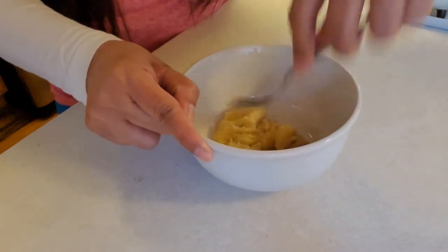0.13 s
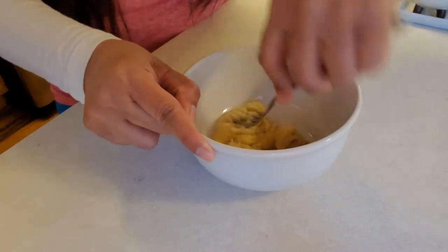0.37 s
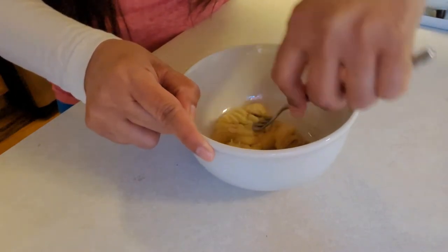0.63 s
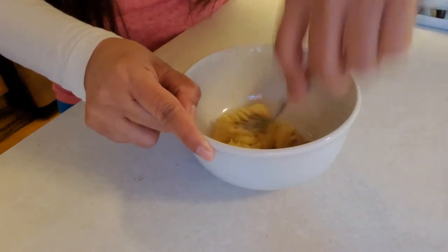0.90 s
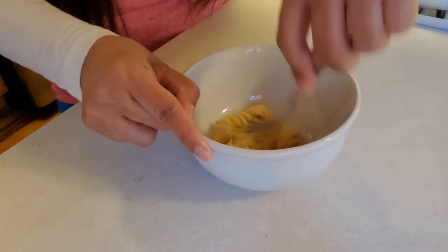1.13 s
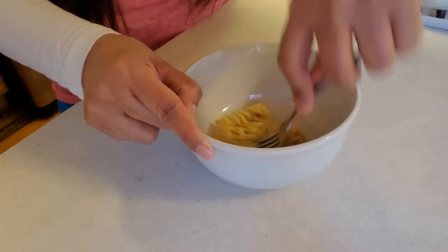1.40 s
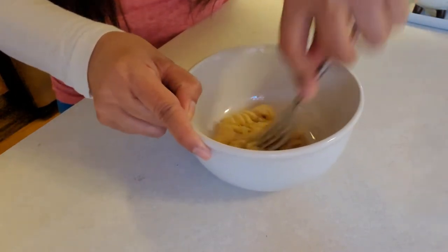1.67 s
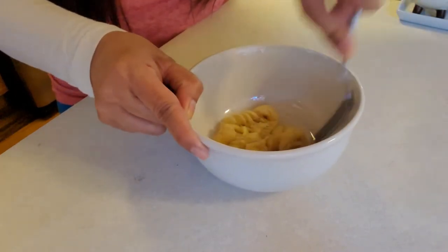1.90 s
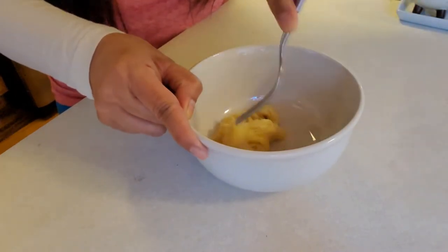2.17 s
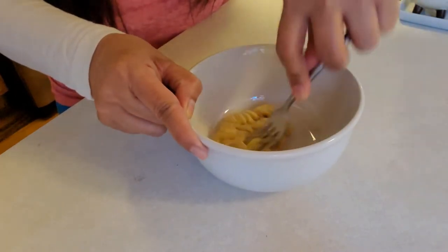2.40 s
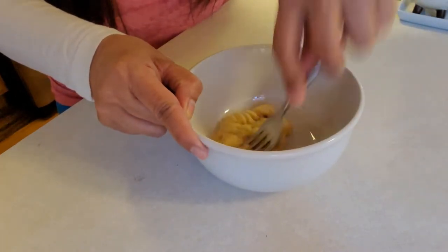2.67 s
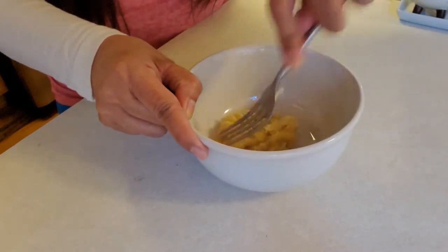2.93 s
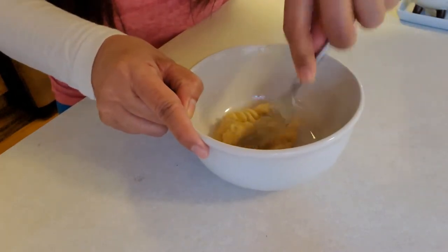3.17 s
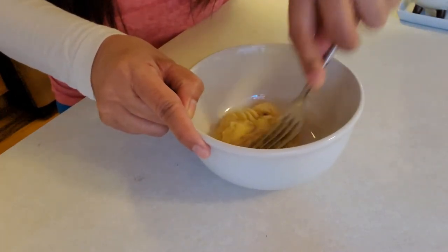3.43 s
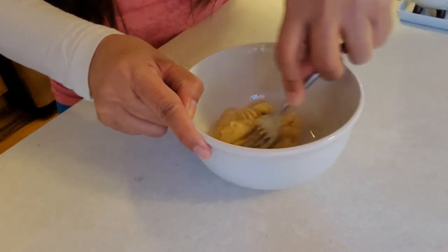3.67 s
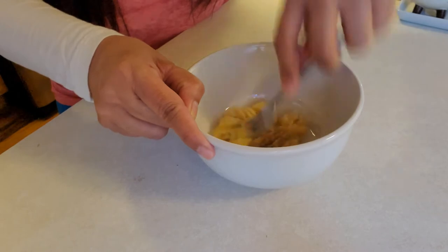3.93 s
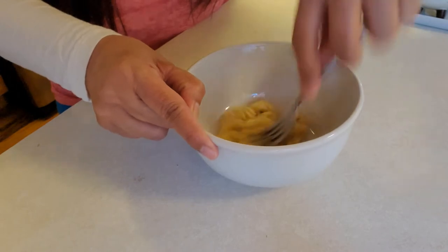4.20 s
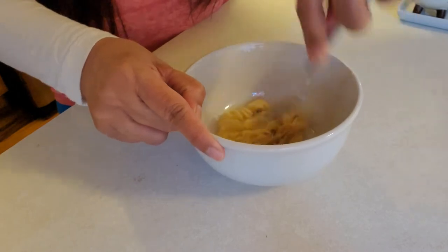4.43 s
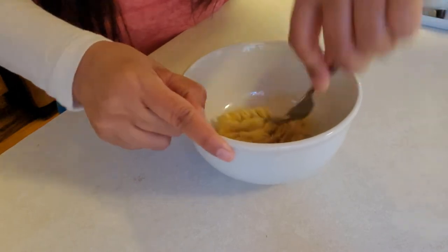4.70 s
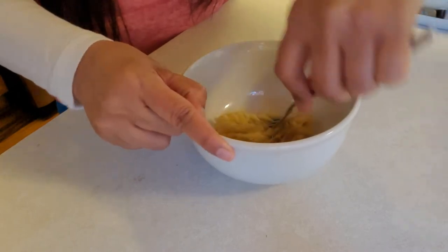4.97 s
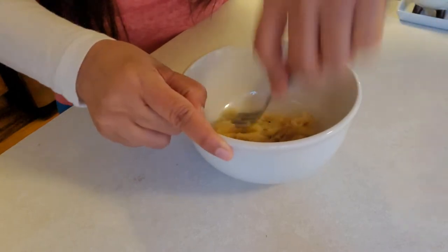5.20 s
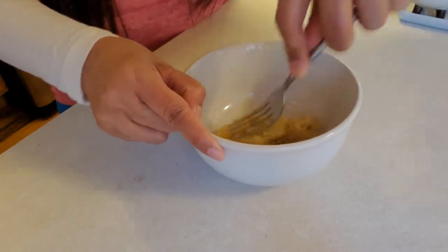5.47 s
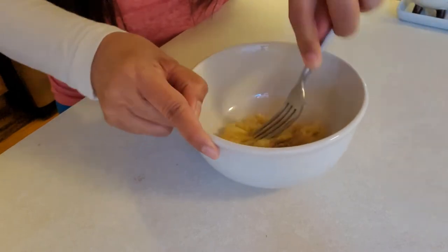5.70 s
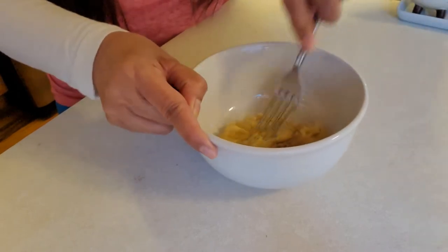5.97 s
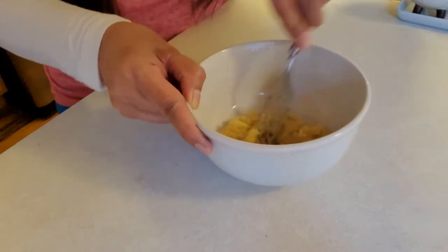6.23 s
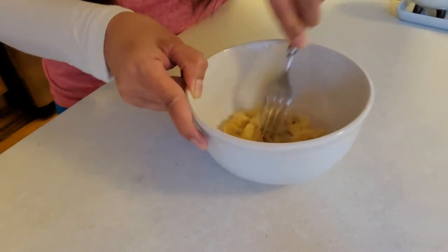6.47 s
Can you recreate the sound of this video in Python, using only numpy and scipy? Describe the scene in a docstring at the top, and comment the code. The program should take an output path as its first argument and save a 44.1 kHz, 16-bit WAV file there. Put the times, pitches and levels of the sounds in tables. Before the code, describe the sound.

Close stereo pickup in a small kitchen, with a faint, steady low rumble throughout. For the first 1.2 s a fork presses soft fruit very quietly: muffled low bumps, tiny wet ticks, faint crackle. Damped fork strikes on the ceramic bowl floor follow at 1.3 and 1.6 s, then a loud bare-wall clink at 1.87 s with an instant bounce and a short bright ring, and a firm knock with a deep counter thud at 1.95 s. Sticky clicks and crackles fill 2.0-2.6 s. Duller taps come at 2.7, 3.05, 3.3 and 3.65 s, with pulp snaps between. Squishing leads to a crisper tap at 4.5 s, another at 4.9 s, and a strong thudding hit at 5.2 s with a faint metallic fork ring. A soft tap at 5.5 s gives way to wet smears and smacks from 6.0 s, most squelchy around 6.4 s.

```python
"""Kitchen counter: a steel fork mashes soft fruit in a ceramic bowl, close to a pair of microphones.
Strikes through the pulp and clinks on the bare wall: noisy tick, decaying bowl and tine modes, chatter.
Each contact also drives the counter's low modes as a thud; once the fork's neck rings.
Pulp smacks (short clicks), crackles and squishes (shaped random snaps); room tails and a steady noise rumble."""
import sys
import numpy as np
from scipy import signal
from scipy.fft import rfft, irfft, next_fast_len
from scipy.io import wavfile
from scipy.ndimage import map_coordinates

SR = 44100
rng = np.random.default_rng(int(sys.argv[2]) if len(sys.argv) > 2 else 0)


def to_wav(sig):
    """Store sig (one row per channel, or 1-D mono) as 16-bit WAV at the path in sys.argv[1].

    Samples outside -1..1 are clipped; the rate is SR.
    """
    pcm = np.clip(np.atleast_2d(sig), -1, 1) * 32767
    pcm = np.round(pcm).astype(np.int16)
    wavfile.write(sys.argv[1], SR, pcm.T)  # frames by channels


def to_linear_factor(level_db):
    """Convert decibel levels (scalar or array-like) to linear amplitude factors."""
    exponent = np.asarray(level_db, float) / 20
    return 10 ** exponent


N = 291060

# tines strike the bowl floor through pulp:
# (time [s], strike level [dB], tine ring level [dB], thud level [dB], contact time [ms])
FLOOR_BLOWS = [(1.288, -26.5, -49, -34, 3.5), (1.592, -23, -51, -28.5, 3.04), (1.9554, -14, -31, -15.5, 2),
               (2.703, -25.5, -62, -32.5, 4.4), (3.046, -30, -72, -34.5, 3.6), (3.3294, -28, -82, -36, 3.6),
               (3.639, -27.5, -62, -39.5, 4.2), (4.5325, -23.5, -31, -23, 1.26),
               (4.8703, -27, -56, -32.5, 4.4), (5.2127, -19, -71, -22, 2.15),
               (5.524, -29.5, -72, -40.5, 2.7), (6.365, -35, -69, -42, 2.37)]
# fork presses the pulp and softly loads the counter:
# (time [s], thud level [dB], contact time [ms], squelch level [dB])
PULP_PRESSES = [(0.132, -46, 13.5, -79), (0.524, -48.5, 12, -106), (0.918, -42, 13.7, -94),
                (3.011, -49, 10.4, -83), (3.078, -41.5, 3.4, -60.5), (3.108, -48, 3.2, -77),
                (4.216, -44.5, 9.2, -95), (4.278, -50.5, 3.8, -67), (5.3, -51, 3.9, -64),
                (5.803, -49, 17.2, -91), (6.352, -43.5, 5, -94)]
# fork clinks on the bare wall and bounces: (time [s], strike level [dB], bowl ring level [dB])
WALL_CLINKS = [(1.868, -8, -25.5), (1.8806, -18, -38)]
# left-right likeness: (frequency [Hz], correlation [0-1])
LIKENESS = [(60, 0.91), (300, 0.77), (640, 0.65), (1400, 0.031)]


def unit(x):
    """Scales to rms 1."""
    return x / np.sqrt(np.mean(x ** 2) + 1e-20)


def along(points, hz):
    """Interpolates (Hz, value) points on a log frequency axis."""
    point_hz, value = np.transpose(points)
    return np.interp(np.log(hz + 1), np.log(point_hz + 1), value)


def filtered(x, response):
    """Multiplies the spectrum of x by a response of frequency."""
    m = next_fast_len(N + SR // 2)
    return irfft(rfft(x, m) * response(np.fft.rfftfreq(m, 1 / SR)), m)[..., :N]


def add(track, start_s, sound):
    """Mixes a sound in from start_s, cut at the end of the track."""
    part = track[..., round(start_s * SR):][..., :sound.shape[-1]]
    part += sound[..., :part.shape[-1]]


def stereo_angle(hz):
    """Half the angle whose cosine is the left-right likeness."""
    return np.arccos(np.clip(along(LIKENESS, hz), -1, 1)) / 2


def kitchen(x, wet_db, lag_s, echo_db):
    """Direct sound, late at the left by lag_s; bowl-wall echoes unlike per side; room tail alike in the bass."""
    # room decay: (frequency [Hz], t60 [s])
    room_t60 = [(100, 0.33), (420, 0.54), (1100, 0.49), (3000, 0.33), (8000, 0.32), (15000, 0.23)]
    inside_s = 0.0012  # bowl echoes arrive within this time
    hz, t, z = signal.stft(rng.standard_normal((2, SR // 2)), SR, nperseg=256)
    angle = stereo_angle(hz)[:, None]
    z = np.cos(angle) * z[0] + np.sin(angle) * z[1] * [[[1]], [[-1]]]
    decay = to_linear_factor(-60 * t / along(room_t60, hz)[:, None])
    tail = signal.istft(z * decay, SR, nperseg=256)[1]
    path = to_linear_factor(wet_db) * np.pad(tail / np.linalg.norm(tail[0]), ((0, 0), (150, 0)))
    path[[0, 1], [round(lag_s * SR), 0]] = 1  # direct sound
    echoes = rng.integers(2, round(inside_s * SR), size=(2, 4))
    path[[[0], [1]], echoes] += to_linear_factor(echo_db) * rng.choice([-1, 1], size=(2, 4))
    return signal.fftconvolve(x[None], path, axes=1)


def ring(modes, scatter_db, blur_hz, seconds):
    """Damped sine modes, strengths redrawn per call; random phase drift slightly blurs each mode's pitch."""
    t = np.arange(round(seconds * SR)) / SR
    hz, db, t60 = np.transpose(modes)[:, :, None]
    db = db + scatter_db * rng.standard_normal(hz.shape)
    # random-walk phase, one step per 64 samples
    steps = rng.standard_normal((len(hz), len(t) // 64 + 1))
    walk = np.sqrt(2 * np.pi * blur_hz / SR) * np.sqrt(64) * np.cumsum(steps, axis=1)
    drift = np.array([np.interp(t, np.arange(len(d)) * 64 / SR, d - d[0]) for d in walk])
    onset = 1 - np.exp(-t / 0.00059)
    return (to_linear_factor(db - 60 * t / t60) * np.sin(2 * np.pi * hz * t + drift)).sum(0) * onset


def tick(hz, cycles, crack, t60):
    """Contact click of peak 1: a damped tone of its own colour plus a crack of band noise."""
    t = np.arange(SR // 50) / SR
    tone = np.exp(-t * hz / cycles) * np.sin(2 * np.pi * hz * t)
    band = signal.butter(2, [0.55 * hz, min(5 * hz, 15500)], "band", fs=SR)
    noise = signal.lfilter(*band, rng.standard_normal(len(t)))
    click = tone + crack * to_linear_factor(-60 * t / t60) * noise
    click = signal.lfilter(*signal.butter(2, 0.55 * hz, "high", fs=SR), click)
    return click / np.abs(click).max()


def rumble():
    """Steady shaped noise, left and right alike in the bass only."""
    # rumble spectrum: (frequency [Hz], relative density [dB])
    rumble_spectrum = [(25, -11), (70, 0.5), (130, -6.5), (240, 0), (400, -3), (540, -10.5), (800, -18.5),
                       (1250, -29.5), (2500, -35), (4200, -39), (5100, -35.5), (6000, -40), (14800, -47.5),
                       (16500, -60.5)]

    def mid_side(hz):
        angle = stereo_angle(hz)
        return to_linear_factor(along(rumble_spectrum, hz)) * [np.cos(angle), np.sin(angle)]

    mid, side = filtered(rng.standard_normal((2, N)), mid_side)
    return to_linear_factor(-58.5) * unit(np.array([mid + side, mid - side]))


def grains(spectrum, rate, spread_db, hiss):
    """Scattered snaps of unequal size over a little hiss, coloured, rms 1."""
    when, size = rng.standard_normal((2, N))
    chosen = np.abs(when) < 1.25 * rate / SR  # about rate snaps a second
    snaps = to_linear_factor(spread_db * size) * np.sign(when) * chosen
    mixed = unit(snaps) + hiss * rng.standard_normal(N)
    return unit(filtered(mixed, lambda hz: to_linear_factor(along(spectrum, hz))))


def stroke(length_s):
    """Smooth envelope of one short stretch of pulp sound."""
    return signal.windows.tukey(max(round(length_s * SR), 3), 0.4)


def mash():
    """Pulp crackles finely where tines pull free, squishes lower where pressed or smeared."""
    # tines pull free of sticky pulp: (time [s], length [s], crackle level [dB])
    pulls = [(0.141, 0.21, -79), (0.364, 0.091, -78.5), (0.498, 0.32, -81), (0.893, 0.18, -79.5),
             (1.106, 0.069, -78), (2.299, 0.082, -67), (2.43, 0.025, -72), (2.497, 0.029, -65.5),
             (2.748, 0.054, -64), (3.083, 0.066, -74), (3.407, 0.093, -73.5), (3.676, 0.083, -62),
             (3.898, 0.13, -74), (4.046, 0.055, -72.5), (4.189, 0.048, -74), (4.32, 0.052, -73),
             (4.64, 0.074, -71), (5.032, 0.08, -76), (5.248, 0.084, -65), (5.656, 0.015, -80),
             (5.897, 0.026, -77), (6.121, 0.13, -72), (6.38, 0.11, -68)]
    # fork smears pulp along the wall, one list a sweep: (time [s], squish level [dB])
    smears = [
        [(0.98, -109), (1.048, -77), (1.14, -92), (1.192, -70), (1.256, -97), (1.27, -78)],
        [(4.1, -75), (4.186, -70), (4.256, -85), (4.284, -69), (4.372, -81.5), (4.52, -66.5)],
        [(5.36, -97), (5.44, -82), (5.52, -64), (5.752, -85), (5.776, -81), (5.85, -89)],
        [(6.04, -79.5), (6.074, -71), (6.206, -64), (6.232, -65.5), (6.43, -58.5), (6.59, -82.5)],
    ]
    # grain spectra: (frequency [Hz], relative density [dB])
    crackle_spectrum = [(1800, -17), (3300, 9.5), (6000, 8.5), (9000, 8.5), (12500, 3.5), (16000, -5)]
    squish_spectrum = [(300, -5.5), (700, -4), (1200, -3.5), (2000, -9.5), (3200, -16.5), (5000, -19),
                       (8000, -29)]
    lead_s, lead_length_s, lead_db = 0.014, 0.011, -73.5  # a faint short crackle just before each blow
    squelch_s, squelch_lead_s = 0.062, 0.019
    lumps_per_s, lump_db = 30, 2  # lumps give way unevenly
    fine, low = np.zeros((2, N))
    for s, length_s, db in pulls:
        add(fine, s, to_linear_factor(db) * stroke(length_s))
        add(low, s, to_linear_factor(db - 5.5) * stroke(length_s))
    for s, *_ in FLOOR_BLOWS:
        add(fine, s - lead_s, to_linear_factor(lead_db) * stroke(lead_length_s))
    for s, *_, db in PULP_PRESSES:
        add(low, s - squelch_lead_s, to_linear_factor(db) * stroke(squelch_s))
    for sweep in smears:
        s, db = np.transpose(sweep)
        t = np.arange(s[0], s[-1], 1 / SR)
        add(low, s[0], to_linear_factor(np.interp(t, s, db)) * signal.windows.tukey(len(t), 0.15))
    crackle = fine * grains(crackle_spectrum, rate=220, spread_db=5, hiss=0.8)
    lump_points = rng.standard_normal(round(N * lumps_per_s / SR) + 4)
    lumps = map_coordinates(lump_points, [np.arange(N) * lumps_per_s / SR])
    squish = low * to_linear_factor(lump_db * lumps) * grains(squish_spectrum, rate=400, spread_db=5, hiss=0.65)
    return kitchen(crackle + squish, wet_db=-2.5, lag_s=0, echo_db=-12.5)[:, :N]


def smacks():
    """Air pockets and sticky threads snap open as clicks; neighbours get different echoes and tails."""
    # wet smacks of the pulp: (time [s], peak level [dB], colour [Hz])
    wet_smacks = [(0.2482, -46, 3330), (0.5726, -49, 2460), (0.918, -58, 8000), (0.943, -52.5, 7100),
                  (0.975, -61, 7950), (1.1414, -52.5, 10000), (1.245, -53, 6450), (1.4653, -46, 8600),
                  (2.0624, -38.5, 5040), (2.0814, -48, 7730), (2.3263, -45, 11900), (2.363, -48, 8400),
                  (2.4543, -45, 9640), (2.5071, -46, 5900), (2.806, -37, 8800), (3.014, -54.5, 3920),
                  (3.078, -42.5, 1160), (3.1114, -45.5, 3540), (3.4321, -54, 6070), (3.4797, -45, 4880),
                  (3.692, -42, 3370), (3.7284, -50, 5270), (3.7628, -37, 13500), (3.935, -49.5, 9050),
                  (3.9566, -47, 10200), (3.9714, -46, 6900), (4.047, -49, 9600), (4.0693, -40.5, 9600),
                  (4.2197, -48.5, 3500), (4.28, -50, 1010), (4.3614, -52, 3330), (4.6708, -38.5, 8050),
                  (4.7242, -42.5, 7350), (4.9, -49, 5070), (5.0699, -50, 9550), (5.204, -58, 2660),
                  (5.3224, -51, 3560), (5.679, -45, 9340), (6.138, -37, 5160), (6.1694, -39, 6000),
                  (6.4048, -45.5, 2500), (6.421, -44, 7900), (6.452, -51, 4000), (6.466, -42, 8200)]
    groups = np.zeros((5, N))
    for k, (s, db, hz) in enumerate(wet_smacks):
        add(groups[k % len(groups)], s, to_linear_factor(db) * tick(hz, cycles=1.3, crack=0.33, t60=0.0093))
    return sum(kitchen(group, wet_db=-4, lag_s=0, echo_db=-3.5)[:, :N] for group in groups)


def thud(db, contact_ms):
    """Counter modes under a push and its release: a longer contact leaves only the lowest."""
    # counter modes: (frequency [Hz], relative level [dB], t60 [s])
    counter_modes = [(70.06, -4.5, 0.45), (82.3, -2.5, 0.33), (107, 0, 0.14), (147.8, 1.5, 0.17),
                     (200, -4.5, 0.06), (226, -10, 0.25), (239, 3.5, 0.035), (300.4, -5, 0.18),
                     (335, -7.5, .07), (394, -16.5, .14), (452.6, -15, 0.18), (531, -17, 0.16),
                     (612.5, -16, 0.066), (702, -9, 0.06), (1100, -14, 0.051)]
    push_share = 0.33  # pulp cushions the start of the push: its share of the release
    tilt_db_per_octave, firm_ms = 3, 2.8  # contacts shorter than firm_ms favour higher modes
    push = np.diff(np.hanning(max(round(contact_ms * SR / 1000), 3)))
    push = push * np.linspace(push_share, 1, len(push))
    modes = np.array(counter_modes)
    hardness = np.clip(np.log2(firm_ms / contact_ms), -1, 1)
    octaves = np.log2(np.minimum(modes[:, 0], 250) / 150)
    modes[:, 1] += tilt_db_per_octave * hardness * octaves
    response = ring(modes, scatter_db=1.0, blur_hz=4.9, seconds=0.41)
    return -to_linear_factor(db) * signal.fftconvolve(response, push / np.abs(push).sum())


def counter_thuds():
    """The force of presses, blows and clinks goes on through the foot of the bowl into the counter."""
    loads = [(s, db, ms) for s, db, ms, _ in PULP_PRESSES]
    loads += [(s, db, ms) for s, _, _, db, ms in FLOOR_BLOWS]
    loads += [(s, bowl_db - 22.5, 6.3) for s, _, bowl_db in WALL_CLINKS]
    counter = np.zeros((2, N))
    for s, db, contact_ms in loads:
        add(counter, s, kitchen(thud(db, contact_ms), wet_db=-10.5, lag_s=0, echo_db=-18.5))
    return counter


def neck_rings():
    """The grip loosens and the modes of the fork's neck ring out."""
    # neck rings: (time [s], level [dB])
    neck_events = [(5.2125, -43)]
    # neck modes: (frequency [Hz], relative level [dB], t60 [s])
    neck_modes = [(3440, -5, .3), (3505, -5, .32), (3560, 4, .06), (2150, 2, .035), (4780, -4, .035)]
    air = np.zeros((2, N))
    for s, db in neck_events:
        neck = ring(neck_modes, scatter_db=1.5, blur_hz=34, seconds=0.4)
        add(air, s, kitchen(to_linear_factor(db) * neck, wet_db=-9, lag_s=0, echo_db=-18))
    return air


def rattle(db, t60, rough_db):
    """Tines chatter unevenly just after contact: decaying band noise, unlike at each side."""
    t = np.arange(SR // 10) / SR
    band = signal.butter(2, [1500, 13000], "band", fs=SR)
    noise = signal.lfilter(*band, rng.standard_normal((2, len(t))))
    bursts = np.repeat(rng.standard_normal(len(t) // 60 + 1), 60)[:len(t)]
    return to_linear_factor(db - 60 * t / t60 + rough_db * bursts) * noise * (1 - np.exp(-t / 0.0016))


def strike(db, bowl_db, tine_db, life, scatter_db, lag_s, echo_db, seconds):
    """Steel on ceramic: tick, ring of bowl (t60 times life) and tines, chatter."""
    # bowl mode frequencies: (frequency [Hz])
    bowl_hz = [987, 1117, 2446, 2574, 2674, 2927, 3122, 3652, 3936, 4576, 4652, 4744, 5523, 6720, 7060,
               7211, 7297, 7924, 9028, 10300, 13850, 14960]
    # bowl modes in the same order: (relative level [dB], undamped t60 [s])
    bowl_decays = [(-15.5, 0.32), (0.5, 0.048), (-14, 0.17), (-9.5, 0.35), (-8.5, 0.38), (-7.5, 0.16),
                   (-18.5, 0.027), (-22.5, 0.077), (-21, 0.06), (-7, 0.1), (-1, 0.37), (2.5, 0.18),
                   (-23.5, 0.066), (-5.5, 0.14), (-12, 0.09), (10.5, 0.03), (-23, 0.062), (-15, 0.066),
                   (-21.5, 0.11), (-19, 0.23), (-19, 0.054), (-9.5, .1)]
    # tine modes: (frequency [Hz], relative level [dB], t60 [s])
    tine_modes = [(4590, -9, .02), (5910, -3, .022), (7780, -4, .03), (10100, -10, .02), (11700, -4, .022),
                  (13700, -13, .02), (14700, -3, .02), (15100, 1, .025)]
    bowl_modes = np.column_stack([bowl_hz, bowl_decays]) * [1, 1, life]
    rings = to_linear_factor(bowl_db) * ring(bowl_modes, scatter_db, blur_hz=13, seconds=seconds)
    add(rings, 0, to_linear_factor(tine_db) * ring(tine_modes, scatter_db=3, blur_hz=95, seconds=0.1))
    click = to_linear_factor(db - 6.5) * tick(hz=2900, cycles=0.23, crack=0.17, t60=0.009)
    heard = kitchen(rings, wet_db=-5.0, lag_s=lag_s, echo_db=echo_db)
    add(heard, 0, kitchen(click, wet_db=2.5, lag_s=lag_s, echo_db=echo_db))
    add(heard, 0, rattle(db - 13.5, t60=0.033, rough_db=5.5))
    return heard


def clinks():
    """Strikes on the bare wall: undamped bowl ring, heard later at the left."""
    air = np.zeros((2, N))
    for s, db, bowl_db in WALL_CLINKS:
        add(air, s, strike(db, bowl_db, tine_db=bowl_db - 35, life=1, scatter_db=0,
                           lag_s=0.00025, echo_db=-22, seconds=0.42))
    return air


def blows():
    """Strikes on the bowl floor, where pulp damps the bowl to a weak, short ring."""
    damped_db, damped_life = -28.5, 0.089  # bowl ring re strike level; share of t60 left
    air = np.zeros((2, N))
    for s, db, tine_db, _, _ in FLOOR_BLOWS:
        add(air, s, strike(db, db + damped_db, tine_db, damped_life, scatter_db=4,
                           lag_s=0, echo_db=-6, seconds=0.16))
    return air


def scene():
    """Fork and pulp, tilted between the sides by frequency, with counter thuds and rumble."""
    # side balance: (frequency [Hz], left over right [dB])
    side_balance = [(200, -6), (700, 9.5), (2400, 3), (4400, 7.5), (8000, 3.5), (15000, -0.5)]
    near = blows() + clinks() + neck_rings() + smacks() + mash()
    near = filtered(near, lambda hz: to_linear_factor(along(side_balance, hz) * [[0.5], [-0.5]]))
    return near + counter_thuds() + rumble()


def roll_off(x):
    """The treble ends steeply here."""
    return signal.sosfilt(signal.butter(12, 16810, fs=SR, output="sos"), x)


def record(dry):
    """The microphones lose the deepest bass and the very top."""
    heard = signal.lfilter(*signal.butter(2, 52, "high", fs=SR), dry)
    heard = filtered(heard, lambda hz: (1 + (hz / 16200) ** 60) ** -0.5)
    return roll_off(heard)


dry = scene()
out = record(dry)
to_wav(out)
```